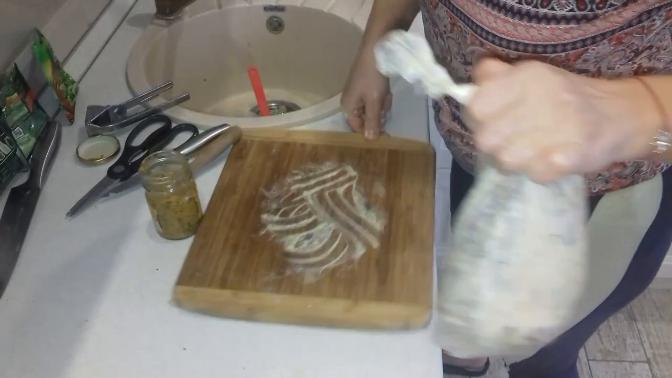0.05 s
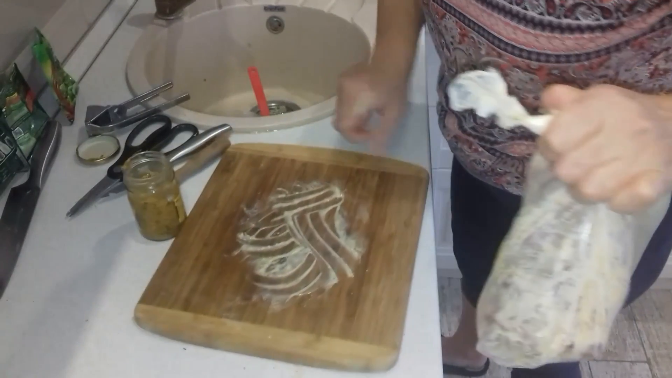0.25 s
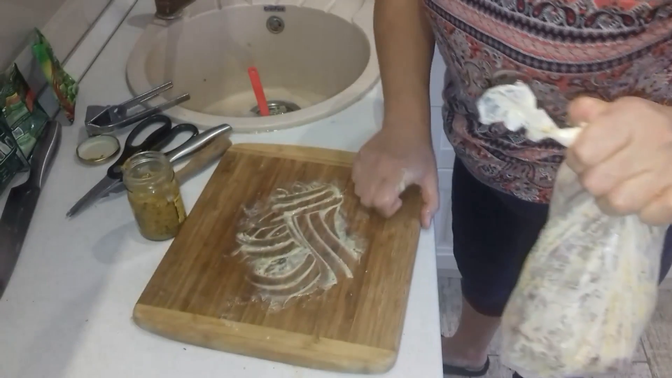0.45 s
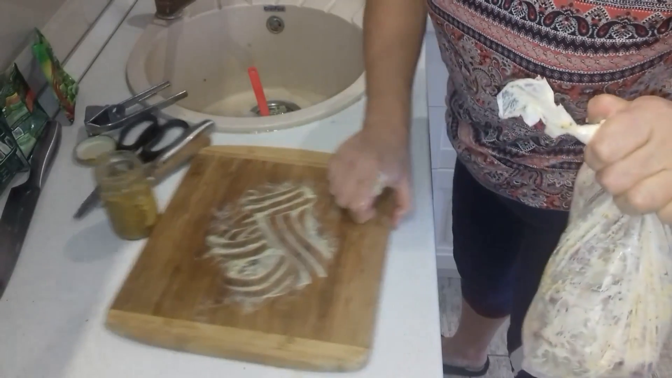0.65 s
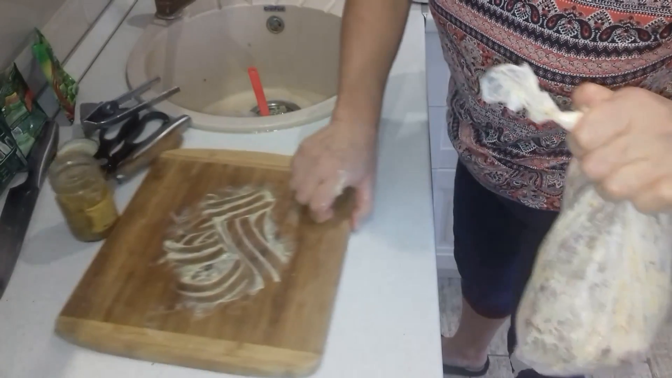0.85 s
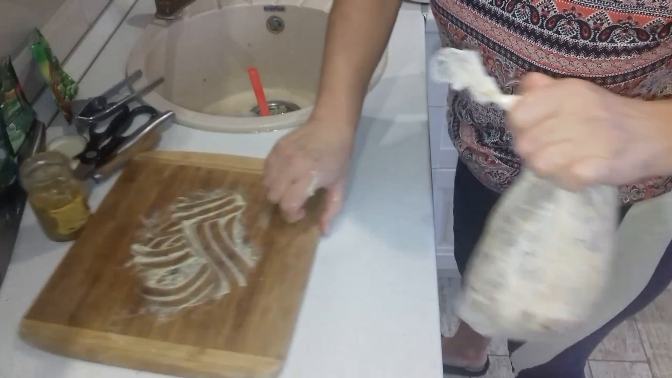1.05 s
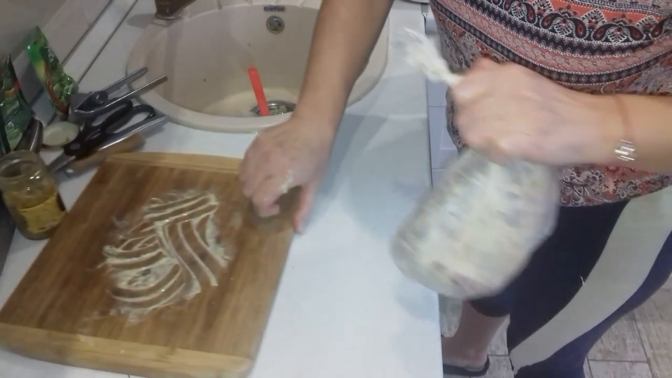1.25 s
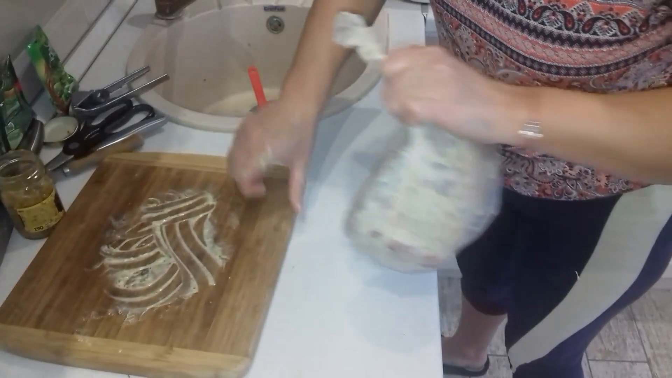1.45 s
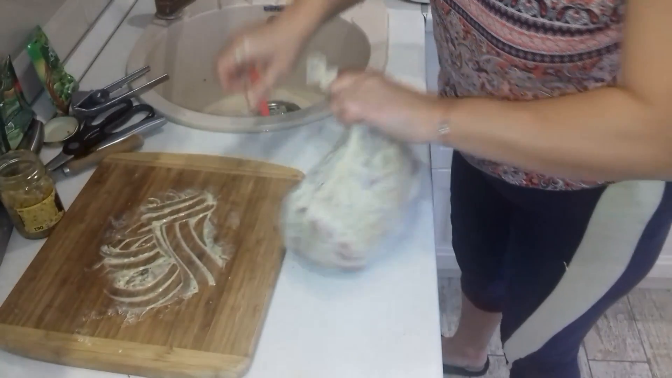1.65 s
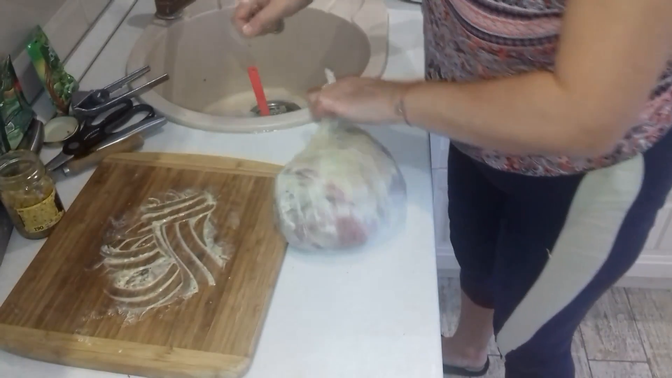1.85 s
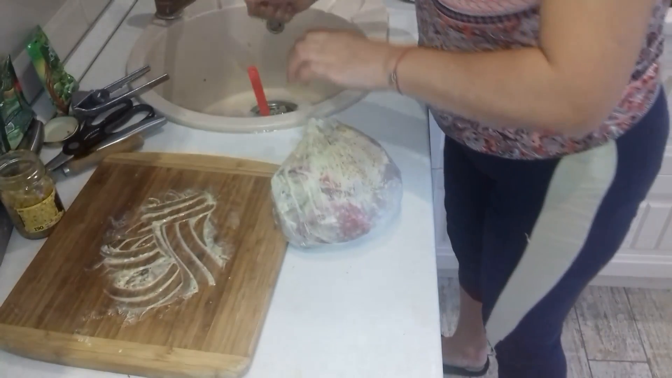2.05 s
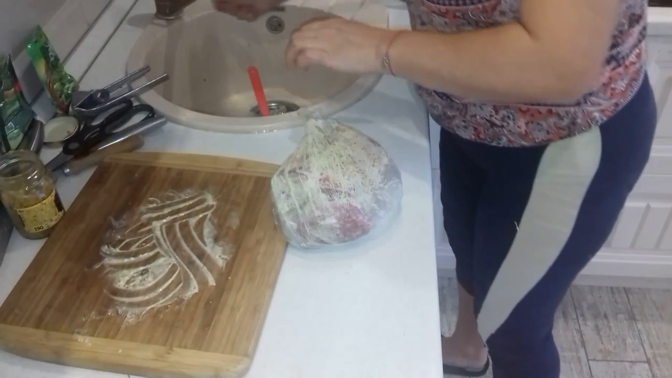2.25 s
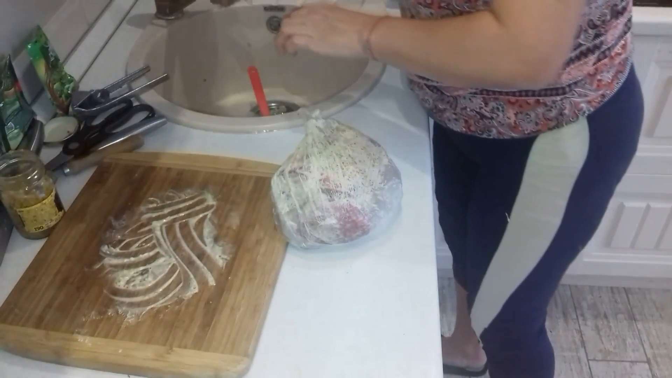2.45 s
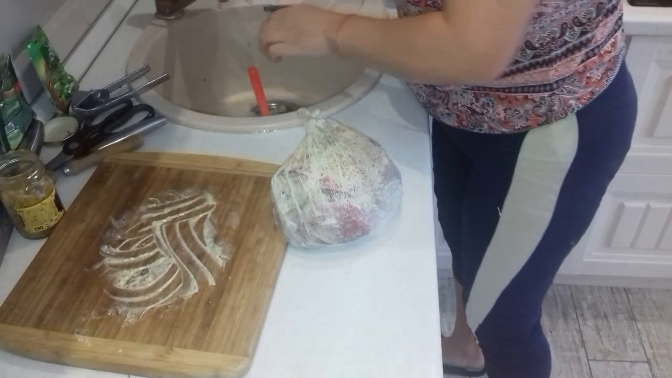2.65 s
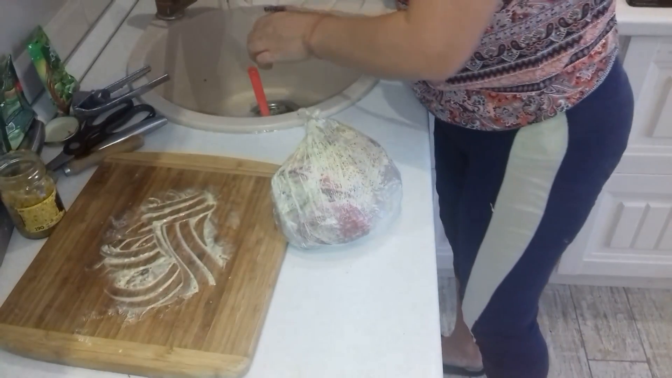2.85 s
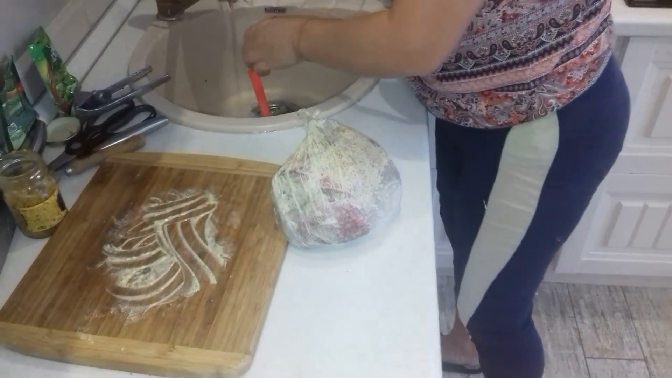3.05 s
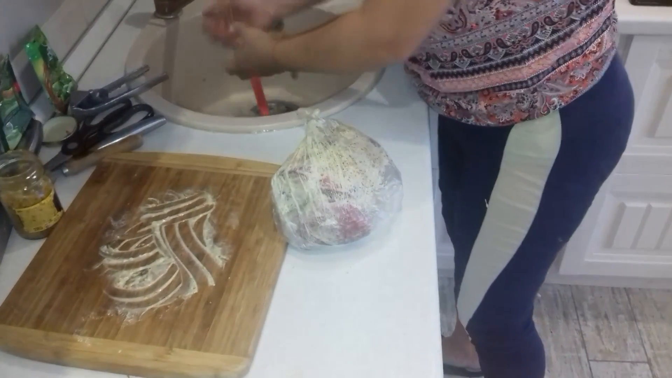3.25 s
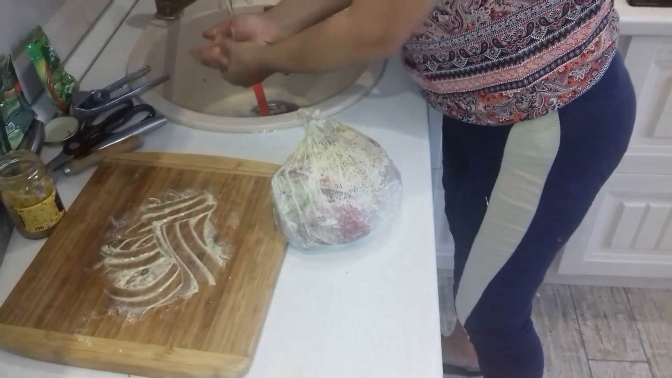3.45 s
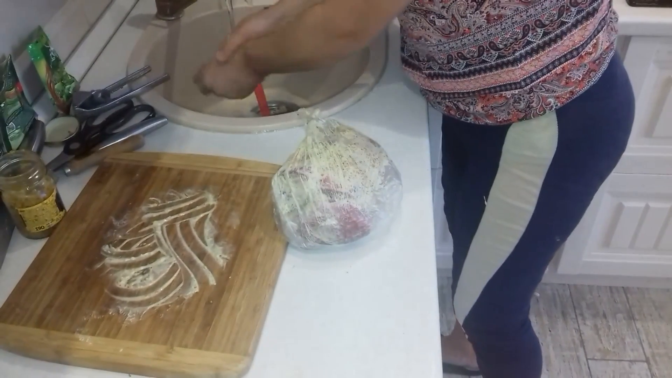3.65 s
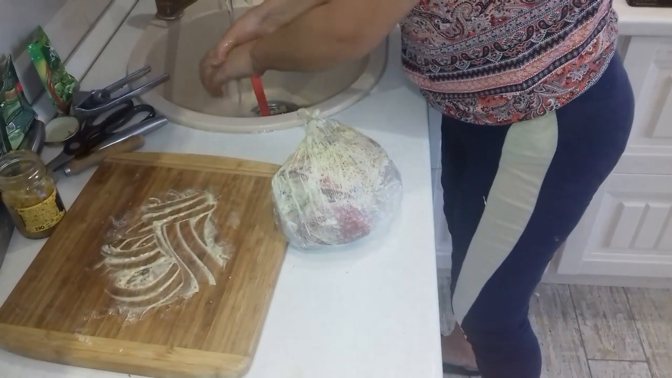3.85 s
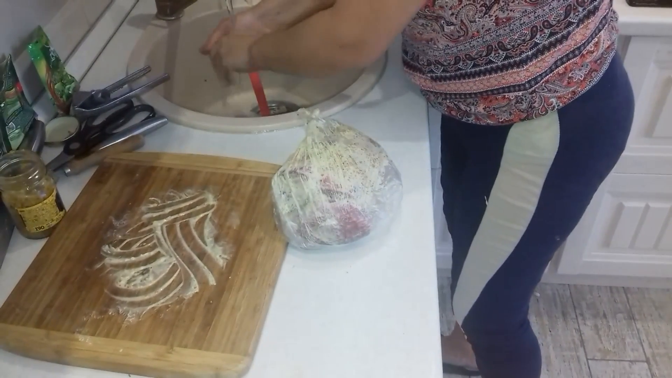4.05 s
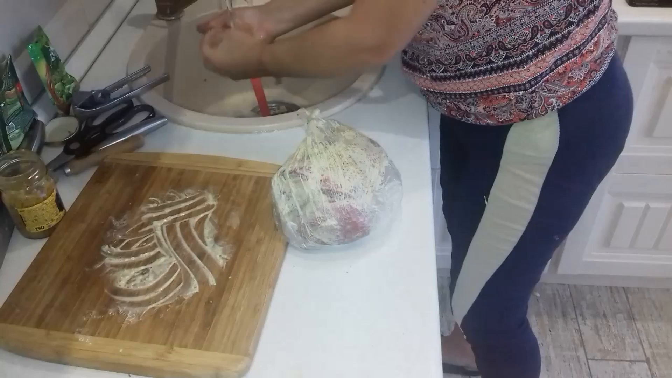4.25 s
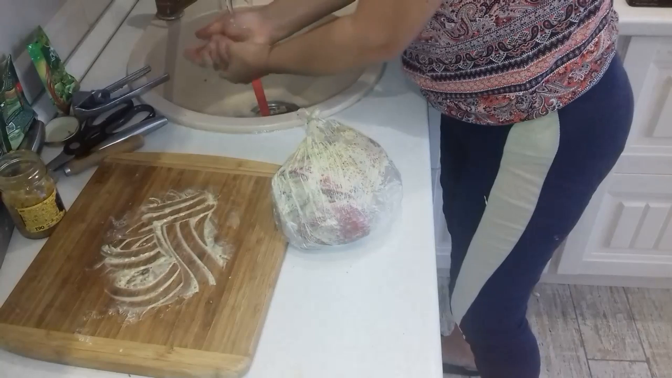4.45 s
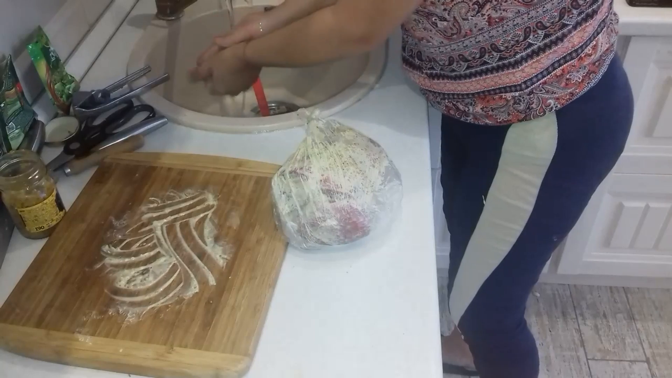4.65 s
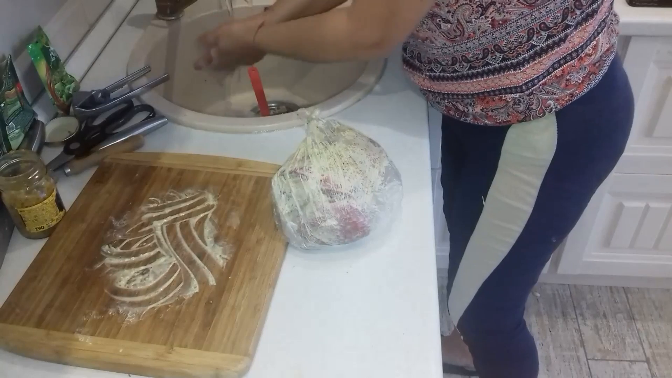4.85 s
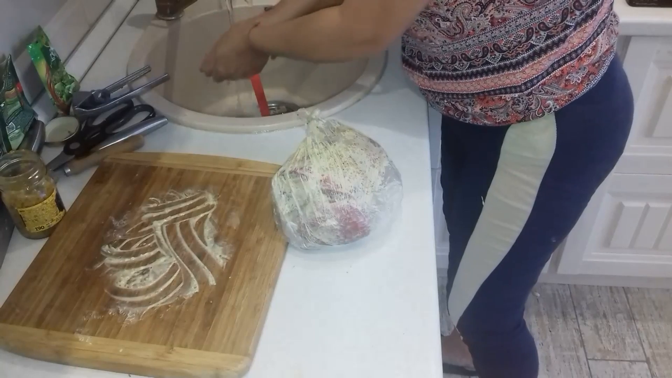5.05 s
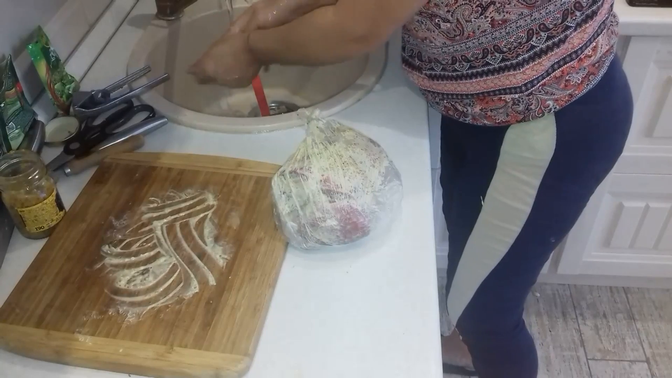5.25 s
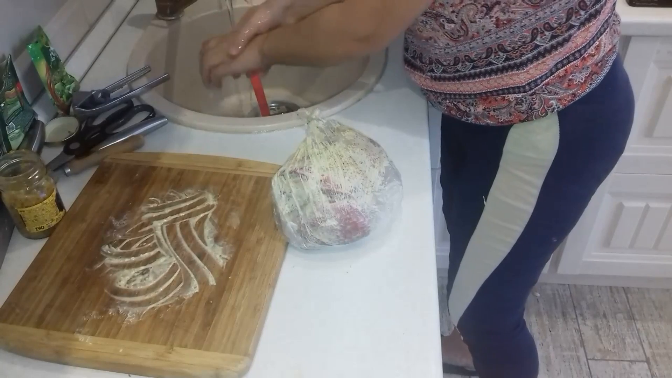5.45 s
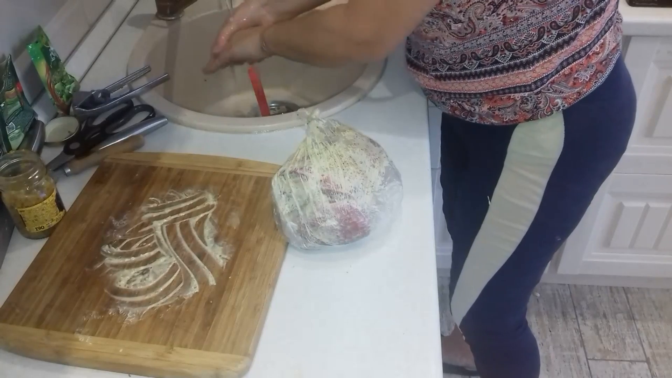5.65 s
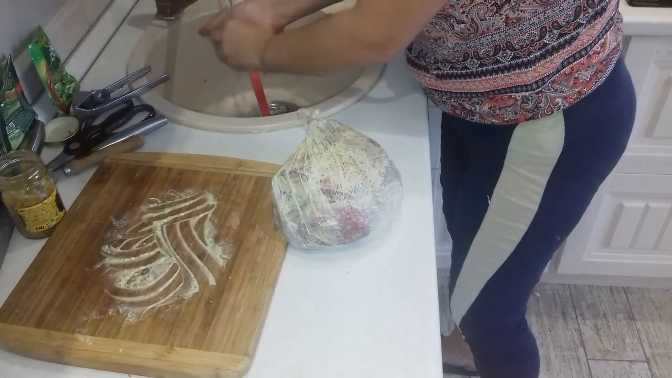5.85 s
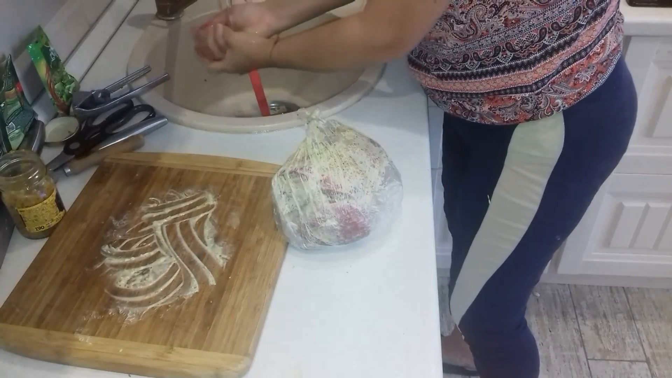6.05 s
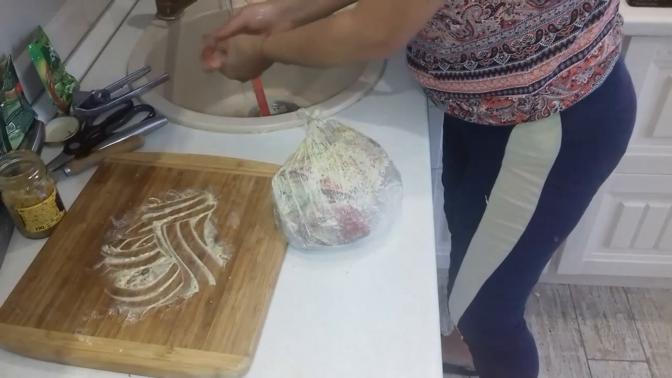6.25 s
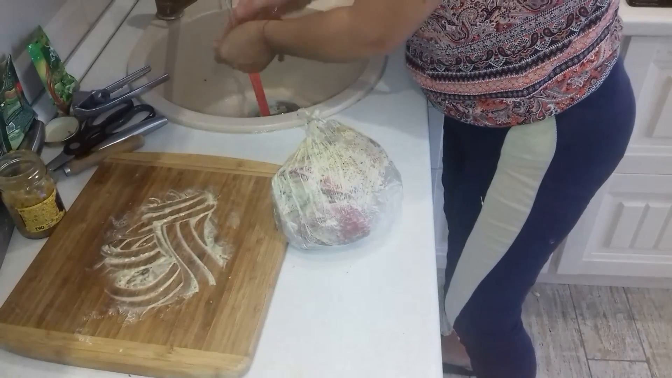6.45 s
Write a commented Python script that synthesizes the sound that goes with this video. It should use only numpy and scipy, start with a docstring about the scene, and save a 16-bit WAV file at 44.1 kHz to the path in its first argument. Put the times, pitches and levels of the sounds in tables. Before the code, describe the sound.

A small, lightly echoing kitchen heard through a thin, bright microphone over faint room air, hum and hiss. At about 0.2-0.4 s a wooden board is tugged over the counter with a low woody rumble and gritty scrape; sharp clicks follow. A second, stronger drag at 0.7-1.0 s jolts a glass jar, giving the loudest clacks near 0.71 and 0.82 s, a rapid rattle and a clear glass ring at 0.75 s. A third, scrapier tug runs 1.1-1.4 s, ending in a bump that briefly rings a metal utensil. At 1.8 s a filled plastic bag lands with a dense crackle, rustling until 2.1 s. Four hollow pipe knocks, the first strongest, come between 2.5 and 3.0 s. From 3.1 s a thin stream drums softly in the basin; from 3.5 s to the end at about 6.6 s hands rub under it with spray, bubbles, squelches and irregular splashes, the sharpest at 4.2 s.

```python
"""Kitchen counter and running tap

A wooden board is dragged over a counter in jerks, jolting a glass jar and utensils; a filled plastic bag is set down.
The pipe knocks four times as the tap opens, then a thin stream drums in the sink and wet hands squelch under it.
Drags, crinkles and water are made of random grains; knocks and splashes are short filtered bursts of noise;
glass and steel are fading tones. The small microphone rings near 4.3 kHz, which brightens every click."""
import sys
import numpy as np
from scipy import signal
from scipy.fft import rfft, irfft, next_fast_len
from scipy.io import wavfile
from scipy.ndimage import uniform_filter1d, minimum_filter1d, map_coordinates

SR = 44100
rng = np.random.default_rng(int(sys.argv[2]) if len(sys.argv) > 2 else 0)


def to_wav(s):
    """Save 16-bit WAV."""
    ch = np.atleast_2d(s).T  # columns
    pcm = np.round(np.clip(ch, -1, 1) * 32767)  # PCM
    wavfile.write(sys.argv[1], SR, pcm.astype(np.int16))


N = 287091  # length of the scene in samples

# tone colour of splashing water: (f/Hz, relative level/dB)
SPLASH_SPECTRUM = [(60, -62), (400, -35), (1500, -25), (3000, -18), (3800, -5), (4300, 0), (4700, -3),
                   (5200, -11), (6200, -19), (7500, -33), (11000, -41), (15500, -47)]
MIC_HZ = 4350  # the microphone's resonance
HANDS_IN_S = 3.55  # the hands are fully under the stream


def board():
    """Tiny slips shake the wood during each tug, while crumbs gather under it and scrape, more so at speed."""
    # tugs: (full speed from/s, until/s, wood rumble level/dB, grit against the wood/dB, rise/dB per s)
    pulls = [(0.228, 0.386, -35.5, -16.5, 186), (0.713, 0.992, -30.5, -22.5, 237),
             (1.11, 1.362, -30.5, -10, 166)]
    # tone colours of the rumbling wood and of the scraping crumbs: (f/Hz, relative level/dB)
    wood_spectrum = [(60, -50), (130, -22), (200, -13), (280, -10.5), (360, 3), (460, -5.5), (570, 3.5),
                     (780, 1.5), (1100, -3), (1500, -9.5), (1900, -7.5), (2600, -21.5), (4000, -6.5),
                     (6000, -52.5)]
    grit_spectrum = [(60, -70.5), (800, -38.5), (2500, -1), (3500, -10.5), (4300, -2.5), (5000, 0),
                     (6000, -16.5), (7500, -23), (8200, -23), (9200, -38), (16000, -54.5)]
    pull_fall_db_per_s = 162.5
    grit_growth_db_per_s = 39.5  # the scrape swells during a tug as crumbs gather
    judder_db = 1.5  # size of the level wobble

    rumble_gain, scrape_gain = np.zeros((2, N))
    for start, end, db, grit_db, rise in pulls:
        speed = swell(start, end, rise, pull_fall_db_per_s)
        age = np.clip(np.arange(N) / SR - start, 0, end - start)
        rumble_gain += amp(db) * speed
        scrape_gain += amp(db + grit_db + grit_growth_db_per_s * age) * speed
    wood = unit(room(colour(grains(rate=700, spread_db=4.5), wood_spectrum), wet_db=1))
    grit = unit(room(colour(grains(rate=380, spread_db=3.5), grit_spectrum), wet_db=2))
    rumble = amp(judder_db * wobble(39.8)) * rumble_gain * wood
    scrape = amp(judder_db * wobble(50)) * scrape_gain * grit
    return rumble + scrape


def clatter():
    """Jolts click and knock; the shoved jar chatters on its base, and hard contacts ring glass and steel."""
    # jar and utensils jolted by the board:
    # (t/s, click level/dB, wooden knock level/dB, click pitch f/Hz, click length/s)
    clacks = [(0.2926, -14, -38, 4300, .025), (0.3533, -15.5, -28.5, 4280, .035),
              (0.378, -32, -22.5, 4230, .05), (0.4517, -24, -38.5, 4000, .025),
              (0.5066, -49.5, -31, 4530, .05), (0.521, -27, -40, 3950, 0.024),
              (0.626, -32, -38.5, 4300, .12), (0.682, -33.5, -38.5, 4400, .06),
              (0.7042, -24, -27, 4120, .08), (0.714, -7, -15, 4130, .08), (0.78, -14, -25.5, 4200, .07),
              (0.824, -7, -24, 4310, .05), (0.843, -12.5, -32, 4200, .06), (1.078, -23, -37.5, 4340, .11),
              (1.27, -18, -45, 4350, .05), (1.383, -19, -20.5, 4160, .024),
              (1.3917, -15, -34.5, 4140, .037)]
    # hard contacts on the glass jar: (t/s, tick level/dB, ring level/dB)
    clinks = [(0.29, -49, -68.5), (0.753, -26, -27.5), (0.802, -27.5, -43), (0.942, -32.5, -54.5),
              (1.269, -37.5, -57), (1.381, -37, -77)]
    # tone colours of the click, the wooden knock and the tick on glass: (f/Hz, relative level/dB)
    click_spectrum = [(60, -75), (1000, -45.5), (2600, -29.5), (3400, -14), (3900, -4), (4250, 5),
                      (4600, 8.5), (5100, -11), (5700, -15.5), (6600, -42.5), (10000, -56.5), (16000, -66)]
    knock_spectrum = [(30, -68.5), (100, -52), (180, -19.5), (350, -4.5), (850, 0.5), (1800, -0.5),
                      (2800, -9.5), (5000, -30.5), (9000, -65)]
    tick_spectrum = [(40, -66.5), (1000, -38), (3000, -13), (5800, 12.5), (6700, -5.5), (7700, -2.5),
                     (9500, -17.5), (10500, -8.5), (12300, -23), (15500, -16)]
    # ringing tones of the jar and of a utensil: (f/Hz, relative level/dB, time to fade 60 dB/s)
    glass_modes = [(3776, 14.5, 0.15), (4290, 17, 0.43), (4470, -3.5, 0.33), (4940, 4, 0.13),
                   (5160, -0.5, 0.24), (5810, 8.5, 0.16), (7686, -3, 0.11), (7580, -4, 0.08),
                   (8600, -22, 0.12), (8900, -18.5, .1), (10500, -17.5, 0.087), (12080, -17.5, 0.19),
                   (13070, -17.5, 0.096), (14570, -17, 0.12), (15470, -13, .08)]
    utensil_modes = [(566, 8, 0.15), (1264, -10, .3), (1670, -1.5, .34), (2404, -14, .27), (4307, 5, 0.08)]
    rocking_start_s, rocking_end_s, rocking_db = .75, .86, -24
    rocking_rise_db_per_s, rocking_fall_db_per_s = 660, 129.5
    bump_s, bump_db = 1.383, -27.5  # the board's last bump rings a utensil

    clicks, knocks, rings = np.zeros((3, N))
    for s, click_db, knock_db, hz, length in clacks:
        add(clicks, s, amp(click_db) * burst(shifted(click_spectrum, hz), length, snap=9.1))
        add(knocks, s, amp(knock_db) * burst(knock_spectrum, 0.17, snap=16))
    rocking = swell(rocking_start_s, rocking_end_s, rocking_rise_db_per_s, rocking_fall_db_per_s)
    rattling = unit(colour(grains(rate=430, spread_db=2), click_spectrum))
    clicks += amp(rocking_db) * rocking * rattling
    for s, tick_db, ring_db in clinks:
        add(rings, s, amp(ring_db) * ring(glass_modes, chatter=.09))
        add(clicks, s, amp(tick_db) * burst(tick_spectrum, .09, snap=2))
    add(rings, bump_s, amp(bump_db) * ring(utensil_modes, chatter=.006))
    thin = signal.butter(2, 450, "highpass", fs=SR, output="sos")  # Hz; takes the bass out of the ringing
    ringing = room(signal.sosfilt(thin, rings), wet_db=-12)
    return room(clicks + knocks, wet_db=-4.0) + ringing


def bag():
    """Thin film buckles in a dense shower of tiny snaps as the load lands and settles."""
    # the bag lands, then slumps: (full from/s, until/s, crinkle level/dB)
    # the landing starts to fade just before its rise is over
    crumples = [(1.804, 1.797, -36), (1.914, 2.07, -45)]
    # tone colour of the plastic film: (f/Hz, relative level/dB)
    film_spectrum = [(100, -45), (400, -23.5), (1000, -19.5), (1700, -13), (2800, -12), (3700, -7),
                     (4300, 1.5), (5000, -8.5), (6000, -19.5), (8000, -29), (11000, -35.5), (15500, -42)]
    rise_db_per_s, fall_db_per_s = 495.5, 100

    gain = np.zeros(N)
    for start, end, db in crumples:
        gain += amp(db) * swell(start, end, rise_db_per_s, fall_db_per_s)
    snaps = colour(grains(rate=3700, spread_db=4.0), film_spectrum)
    return gain * unit(room(snaps, wet_db=-4.5))


def pipe():
    """Opening the tap sets off thuds, blurred by the pipework; a hard one also rattles the fitting."""
    # knocks in the pipe: (t/s, thud level/dB)
    pipe_knocks = [(2.488, -31), (2.657, -41), (2.828, -50), (3.004, -49)]
    # tone colours of the hollow pipe and of the loose fitting: (f/Hz, relative level/dB)
    pipe_spectrum = [(30, -37), (100, -30), (200, 3.5), (400, 2), (850, 6), (1100, 2), (1600, -21),
                     (3000, -24.5), (6000, -42)]
    rattle_spectrum = [(400, -40), (1200, 19), (2400, 5.5), (3200, 0.5), (4200, 12), (5300, 3), (6200, -17),
                       (12000, -50)]
    hollow_db = -2.5  # the pipe's hollow body against the thud
    fitting_db, fitting_growth = -33, 3.6  # rattle at the first knock; dB it loses for each dB of thud

    out = np.zeros(N)
    for s, thud_db in pipe_knocks:
        wave = bending_wave(start_hz=980, end_hz=290, glide=.019, t60=.095)
        blurred = signal.fftconvolve(wave, flurry(.025, snap=20))
        rattle_db = fitting_db + fitting_growth * (thud_db - pipe_knocks[0][1])
        add(out, s, amp(thud_db) * blurred / np.abs(blurred).max())
        add(out, s, amp(thud_db + hollow_db) * burst(pipe_spectrum, 0.072, snap=7.5))
        add(out, s, amp(rattle_db) * burst(rattle_spectrum, 0.14, snap=18))
    return room(out, wet_db=-6.0)


def tap():
    """The stream drums on the basin; the rubbing hands break it into spray and bubbles."""
    # tone colours of the basin, the spray and the microphone: (f/Hz, relative level/dB)
    sink_spectrum = [(30, -28), (80, -35), (250, -14), (520, -12), (690, 0.5), (820, 2), (960, 0),
                     (1220, -11), (1500, -5), (2000, -10.5), (3000, -19.5), (6000, -49.5)]
    spray_spectrum = [(60, -73), (1000, -18), (2000, -25), (3100, -12), (3900, 8), (4350, 10.5), (5000, 1),
                      (6000, -22), (8000, -23), (11000, -21), (15500, -27)]
    microphone_spectrum = [(60, -20), (1500, -11), (3000, -7), (3800, 8), (4350, 12.5), (5200, -3),
                           (6500, 7), (9000, 17), (15500, -27)]
    open_s, open_rise_db_per_s, drum_db = 3.14, 73, -57.5  # the stream reaches full flow at open_s
    hands_rise_db_per_s, spray_db = 28, -59
    rub_peak_s, rub_period_s, rub_db = 4.16, 1, 3  # the spray swells with each rub

    flow = swell(open_s, N / SR, open_rise_db_per_s, 0)
    hands_in = swell(HANDS_IN_S, N / SR, hands_rise_db_per_s, 0)
    rubbing = np.cos(2 * np.pi * (np.arange(N) / SR - rub_peak_s) / rub_period_s)
    spray_gain = amp(spray_db + rub_db * rubbing + 1.3 * wobble(4)) * hands_in
    basin = unit(room(colour(grains(rate=1200, spread_db=7.5), sink_spectrum), wet_db=5))
    drops = unit(room(colour(grains(rate=600, spread_db=4), spray_spectrum), wet_db=0))
    plinks = bubbles(rate=150, centre_hz=3400, cycles=5, spread_db=7)
    plinks = unit(room(colour(plinks, microphone_spectrum), wet_db=5))
    spatter = .85 * drops + .55 * plinks
    drumming = amp(drum_db + 0.2 * wobble(10)) * basin
    return flow * (drumming + spray_gain * spatter)


def hands():
    """Wet skin smacks in big splashes and air pops between the palms; small ones of both come at uneven moments."""
    # big splashes off the hands: (t/s, level/dB, centre f/Hz, time to rise 60 dB/s, time to fade 60 dB/s)
    splashes = [(3.272, -52.5, 4700, 0.0092, .06), (3.52, -50, 4050, 0.13, .15),
                (3.763, -43.5, 4730, .005, 0.093), (3.933, -48.5, 4400, 0.0068, 0.025),
                (4.104, -37, 4190, 0.043, 0.12), (4.167, -36, 4454, .04, 0.13),
                (4.183, -24, 4270, 0.025, 0.044), (4.328, -34, 3850, 0.0057, 0.032),
                (4.984, -45.5, 3840, .01, 0.038), (5.11, -32.5, 4480, 0.0068, 0.088),
                (5.164, -37.5, 4350, 0.044, 0.19), (5.267, -34.5, 3950, 0.022, .06),
                (5.776, -34, 4500, 0.005, 0.028), (6.05, -31, 4110, 0.0044, .09),
                (6.116, -32.5, 4350, 0.19, 0.068), (6.327, -37, 4560, 0.0033, 0.032),
                (6.451, -43, 4700, 0.013, 0.047)]
    # air squeezed out between the palms: (t/s, level/dB, cavity f/Hz, length/s)
    squelches = [(3.062, -54, 2900, 0.094), (4.0976, -45, 2140, 0.06), (4.1834, -39, 1890, 0.022),
                 (4.2994, -35, 2250, .12), (4.4424, -44, 3020, .068), (5.157, -40, 2180, 0.17),
                 (5.256, -36.5, 2630, 0.1), (5.88, -49, 1620, 0.13)]
    drips_per_s, drip_db, drip_length_s = 14, -49, 0.032  # small splashes in between
    gurgle_hz, gurgle_db = 2006, -57.5  # small squelches in between; pitch varies around this
    lead = .08  # s before its peak that a splash starts

    out = np.zeros(N)
    for s, db, hz, rise, length in splashes:
        add(out, s - lead, amp(db) * splash(hz, rise, length, lead))
    for s, db, hz, length in squelches:
        add(out, s, amp(db) * burst(cavity(hz), length, snap=5))
    for s in np.arange(HANDS_IN_S, N / SR, 1 / drips_per_s):
        drip_late, pop_late, pitch = rng.uniform(-1, 1, 3)
        drip_spectrum = shifted(SPLASH_SPECTRUM, MIC_HZ * np.exp(.08 * pitch))
        drip = burst(drip_spectrum, drip_length_s, snap=1)
        pop = burst(cavity(gurgle_hz * np.exp(.35 * pitch)), 2 * drip_length_s, snap=1)
        add(out, s + drip_late / drips_per_s, amp(drip_db) * drip)
        add(out, s + pop_late / drips_per_s, amp(gurgle_db) * pop)
    return room(out, wet_db=-2.0)


def background():
    """Quiet room air is filtered noise; a faint mains hum is a steady sine."""
    # tone colour of the room air: (f/Hz, relative level/dB)
    quiet_spectrum = [(20, -24), (45, -13.5), (70, -9.5), (100, -7.5), (135, 2), (200, -8.5), (450, -3),
                      (800, -6), (2000, -8.5), (3000, -14.5), (4300, -2), (6000, -21.5), (15500, -41)]
    hum_hz, hum_db, air_db = 100, -84, -66
    hum = np.sqrt(2) * np.sin(2 * np.pi * hum_hz * np.arange(N) / SR)  # rms 1
    air = unit(colour(rng.standard_normal(N), quiet_spectrum))
    return amp(hum_db) * hum + amp(air_db) * air


def splash(hz, rise, length, lead, count=220, size=128):
    """A crowd of droplets and tiny bubbles peaks after lead seconds and thins out; loudest moment has rms 1."""
    t = np.arange(SR // 4) / SR - lead
    shape = amp(-60 * np.maximum(-t / max(rise, .002), t / max(length, .005)))
    droplets = rng.standard_normal(len(t)) * amp(5 * rng.standard_normal(len(t))) * shape
    starts = rng.integers(0, len(t), (count, 1))
    bubble_hz = hz * np.exp(.3 * rng.standard_normal((count, 1)))
    cycles = bubble_hz * np.arange(SR // 80) / SR
    tones = shape[starts] * np.exp(-cycles / 9) * np.sin(2 * np.pi * cycles * (1 + cycles / 500))
    places = starts + np.arange(SR // 80)
    wet = np.bincount(places.ravel(), tones.ravel(), len(t))[:len(t)]
    x = colour(unit(droplets) + .8 * unit(wet), shifted(SPLASH_SPECTRUM, hz))
    return x / np.sqrt(uniform_filter1d(x ** 2, size).max())


def bubbles(rate, centre_hz, cycles, spread_db):
    """Small bubbles burst at random, each a brief tone that rises a little as it nears the surface."""
    draws = rng.standard_normal((int(rate * N / SR), 2))
    starts = rng.integers(0, N, len(draws))
    t = np.arange(SR // 40) / SR
    hz = np.clip(centre_hz * np.exp(0.4 * draws[:, :1]), 900, 6500)
    age = t * hz / cycles
    rise = 1 + .025 * np.minimum(age, 4)
    strength = amp(spread_db * np.tanh(draws[:, 1:]))
    tones = strength * np.exp(-age) * np.sin(2 * np.pi * hz * t * rise)
    places = starts[:, None] + np.arange(len(t))
    return unit(np.bincount(places.ravel(), tones.ravel(), N)[:N])


def cavity(hz):
    """The spectrum of an air pocket that resonates at hz."""
    return [(hz / 30, -55), (hz / 1.5, -14), (hz / 1.15, -3), (hz, 0), (hz * 1.15, -4),
            (hz * 1.45, -13), (hz * 2.1, -17), (hz * 3, -38), (hz * 6, -54)]


def bending_wave(start_hz, end_hz, glide, t60):
    """High bending waves outrun low ones, so a knock arrives as a falling tone."""
    t = np.arange(SR // 4) / SR
    hz = end_hz + (start_hz - end_hz) * np.exp(-t / glide)
    onset = 1 - np.exp(-t / 0.0021)
    return np.sin(2 * np.pi * np.cumsum(hz) / SR) * amp(-60 * t / t60) * onset


def ring(modes, chatter):
    """Decaying tones, shaken anew while the contact chatters."""
    t = np.arange(SR // 4) / SR
    tone = np.zeros(len(t))
    for hz, db, t60 in modes:
        tone += amp(db - 60 * t / t60) * np.sin(2 * np.pi * hz * t)
    return signal.fftconvolve(tone, flurry(chatter, snap=8))


def burst(spectrum, length, snap, size=128):
    """A coloured flurry whose loudest moment (over size samples) has rms 1."""
    x = colour(flurry(length, snap), spectrum)
    return x / np.sqrt(uniform_filter1d(x ** 2, size).max())


def flurry(length, snap):
    """A first impulse and a dying crowd of smaller ones, energy 1."""
    t = np.arange(SR // 8) / SR
    sizes_db = 3 * rng.standard_normal(len(t)) - 60 * t / max(length, .005)
    x = rng.standard_normal(len(t)) * amp(sizes_db)
    x[0] += snap
    return x / np.linalg.norm(x)


def grains(rate, spread_db):
    """Random tiny impulses of uneven size, rate of them a second on average, rms 1."""
    hits = rng.random(N) < rate / SR
    signs = rng.choice([-1, 1], N)
    sizes = amp(spread_db * rng.standard_normal(N).clip(-2.3, 2.3))
    return unit(hits * signs * sizes)


def room(x, wet_db, delay=.003):
    """The sound with the small kitchen's short tail, a noise that dies away at its own pace in each band."""
    # how long the kitchen echoes: (f/Hz, time to fade 60 dB/s)
    kitchen_decay = [(150, 0.88), (600, 0.36), (1500, 0.39), (4300, 0.35), (8000, 0.43), (15000, 1)]
    hz, t, z = signal.stft(rng.standard_normal(SR // 2), SR, nperseg=256)
    fade = amp(-60 * t / along(kitchen_decay, hz)[:, None])
    tail = signal.istft(z * fade, SR, nperseg=256)[1]
    tail = np.pad(tail / np.linalg.norm(tail), (round(delay * SR), 0))
    return x + amp(wet_db) * signal.fftconvolve(x, tail)[:N]


def colour(x, spectrum, size=2048):
    """Filter with the given spectrum that never sounds ahead of its input (minimum phase, from the cepstrum)."""
    cepstrum = irfft(np.log(amp(along(spectrum, np.fft.rfftfreq(size, 1 / SR)))))
    cepstrum[1:size // 2] *= 2
    cepstrum[size // 2 + 1:] = 0
    response = irfft(np.exp(rfft(cepstrum)))
    return signal.fftconvolve(x, response)[:len(x)]


def shifted(spectrum, hz):
    """The spectrum slid along so that what lay at the microphone's resonance lies at hz."""
    return [(f * hz / MIC_HZ, db) for f, db in spectrum]


def swell(start, end, rise, fall):
    """A gain that climbs to 1 at start, holds until end and dies away; slopes in dB per second."""
    t = np.arange(N) / SR
    return amp(-rise * np.maximum(start - t, 0) - fall * np.maximum(t - end, 0))


def wobble(rate):
    """A smooth random curve, rate knots a second."""
    knots = rng.standard_normal(int(N * rate / SR) + 4)
    return map_coordinates(knots, [np.arange(N) * rate / SR])


def add(track, s, x):
    """Mix x into the track at s seconds."""
    part = track[max(round(s * SR), 0):][:len(x)]
    part += x[:len(part)]


def amp(db):
    """Decibels to gain."""
    return np.exp(np.asarray(db) * (np.log(10) / 20))


def unit(x):
    """Scaled to rms 1."""
    return x / np.sqrt(np.mean(x ** 2) + 1e-20)


def along(points, hz):
    """(f/Hz, value) points read at hz on a log axis."""
    f, v = np.transpose(points)
    return np.interp(np.log(hz + 1), np.log(f + 1), v)


def scene():
    """Everything reaches one microphone with little bass, alike in both channels."""
    low_cut = signal.butter(2, 130, "highpass", fs=SR, output="sos")
    sources = board() + clatter() + bag() + pipe() + tap() + hands()
    mono = signal.sosfilt(low_cut, sources) + background()
    return np.array([mono, mono])


def record(dry):
    """A limiter holds the loudest peaks, the converter adds hiss and an offset; a sharp band limit comes last."""
    ceiling, top_hz = .8, 15800
    hiss_db, offset = -73, -.0006
    needed = np.minimum(1, ceiling / (np.abs(dry).max(0) + 1e-9))
    gain = uniform_filter1d(minimum_filter1d(needed, size=257), size=129)  # turns down just ahead of a peak
    x = dry * gain + amp(hiss_db) * rng.standard_normal(dry.shape) + offset
    m = next_fast_len(N + SR // 2)
    passed = np.fft.rfftfreq(m, 1 / SR) < top_hz
    return irfft(rfft(x, m) * passed, m)[:, :N]


dry = scene()
out = record(dry)
to_wav(out)
```